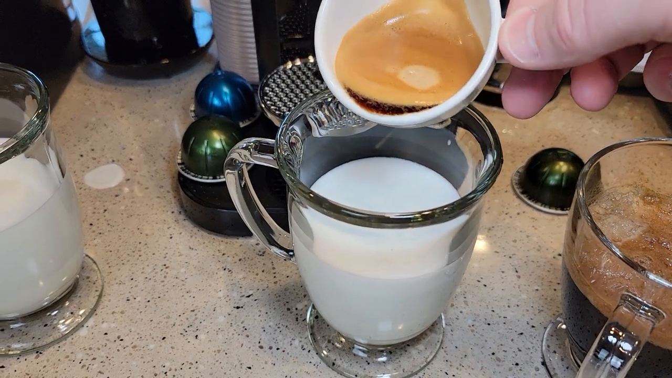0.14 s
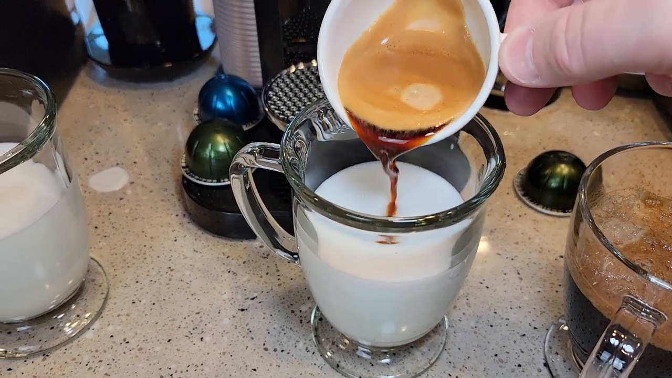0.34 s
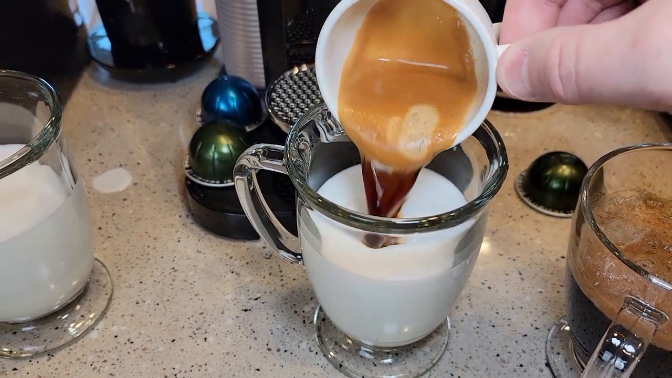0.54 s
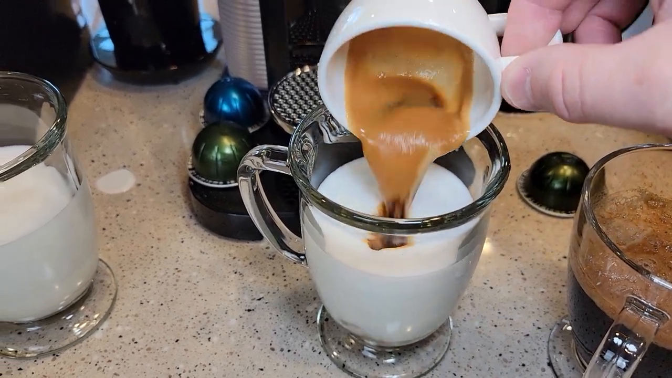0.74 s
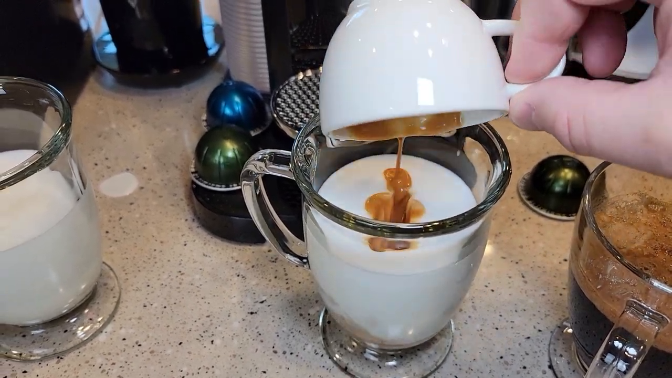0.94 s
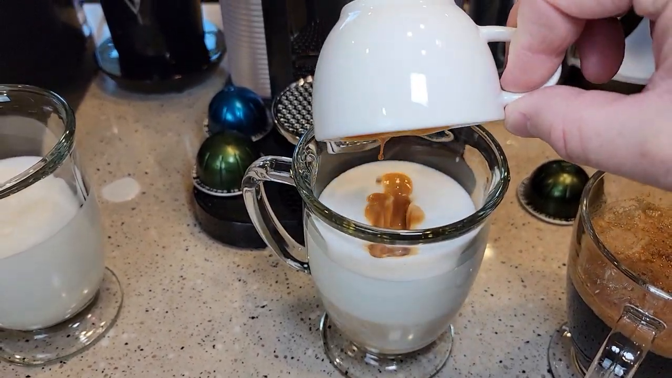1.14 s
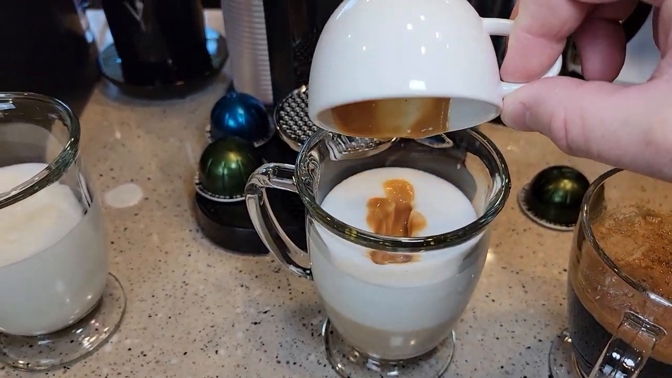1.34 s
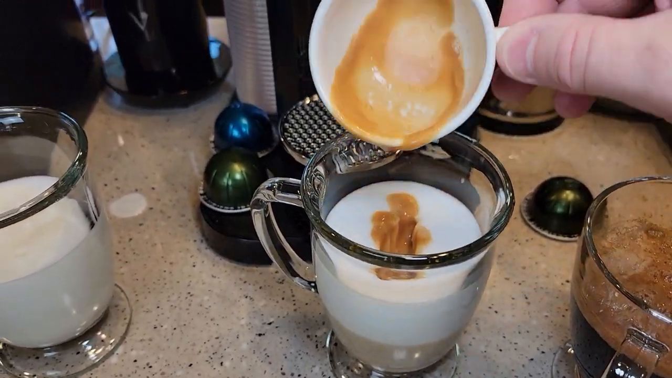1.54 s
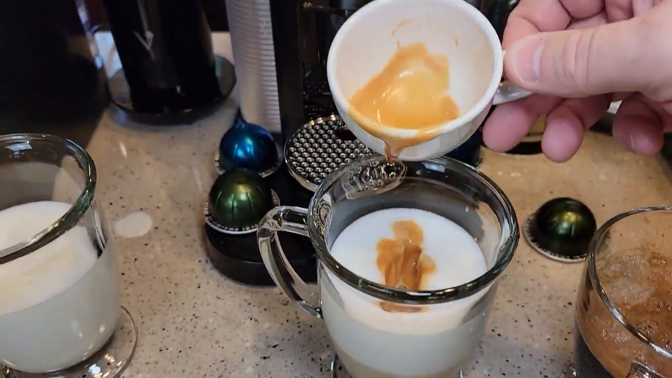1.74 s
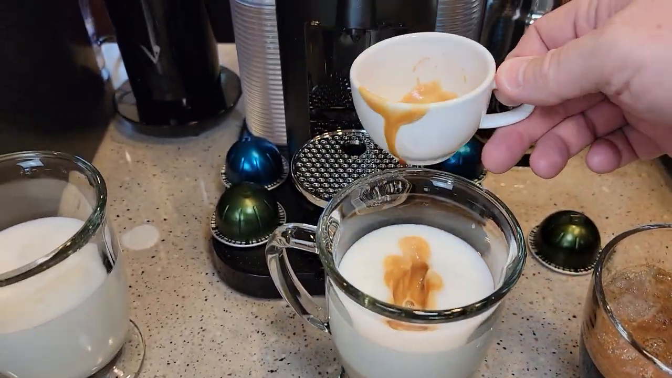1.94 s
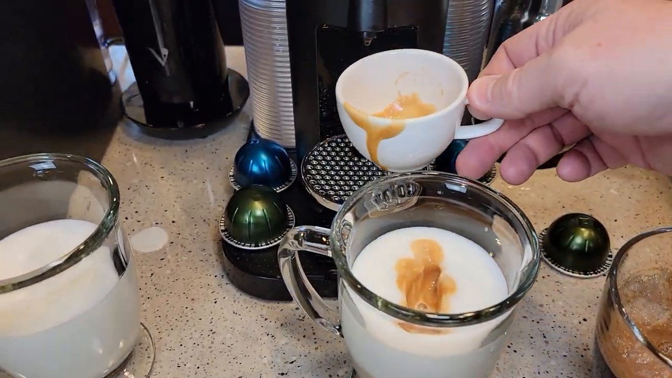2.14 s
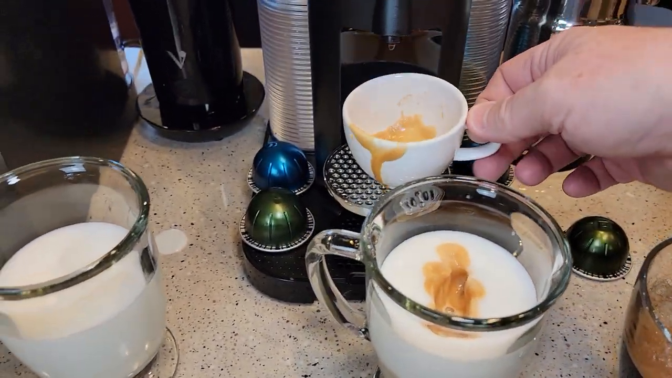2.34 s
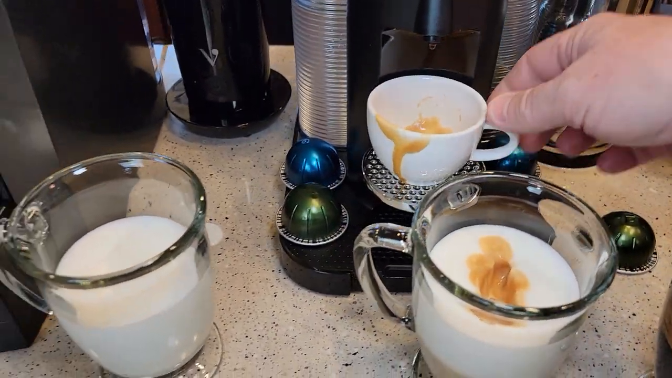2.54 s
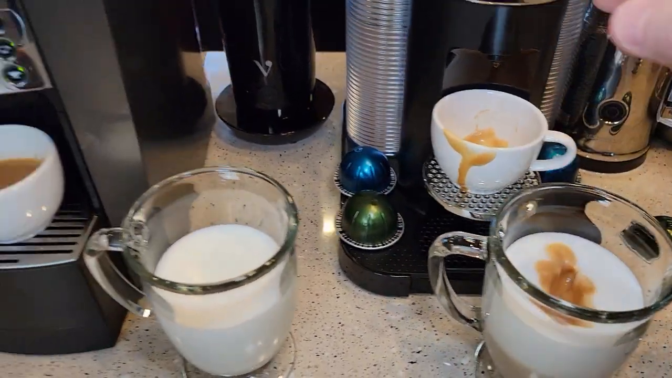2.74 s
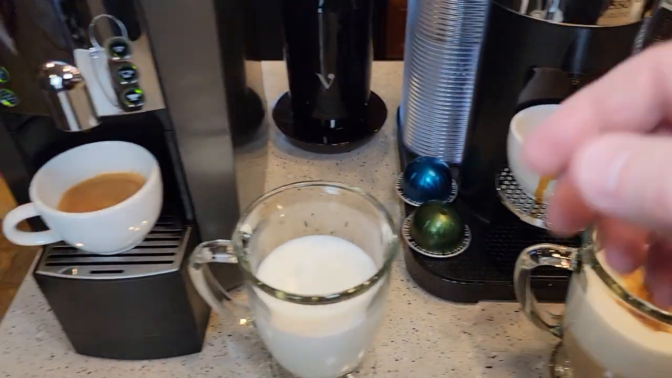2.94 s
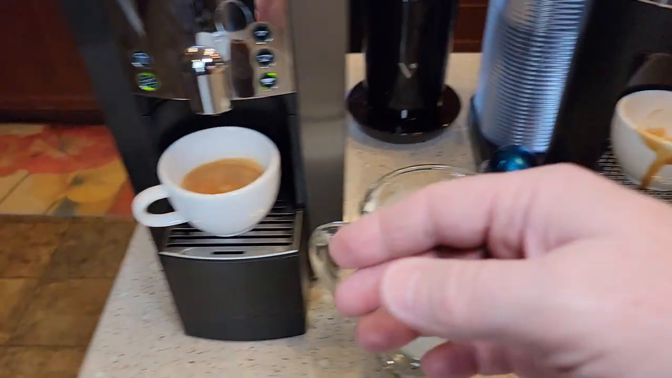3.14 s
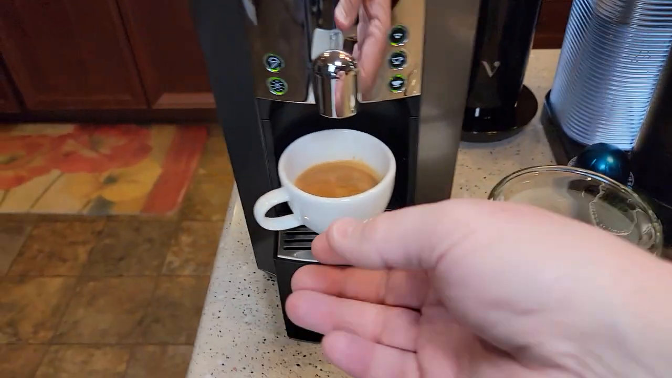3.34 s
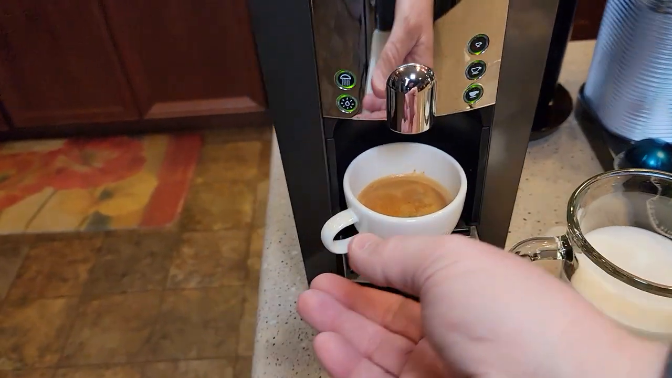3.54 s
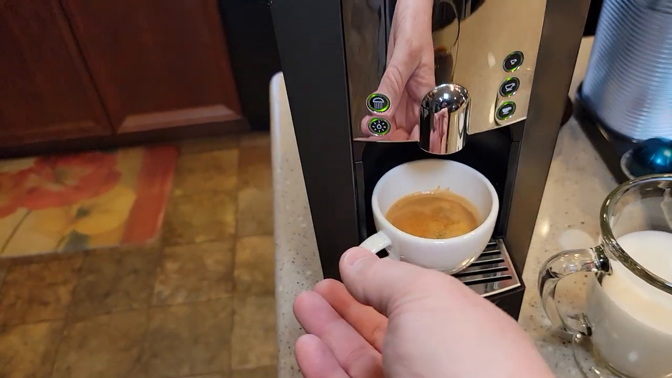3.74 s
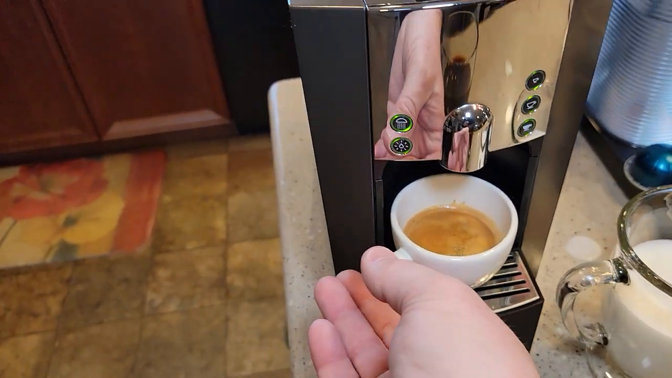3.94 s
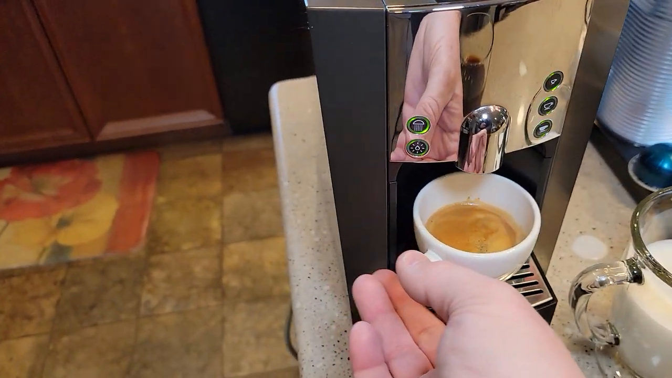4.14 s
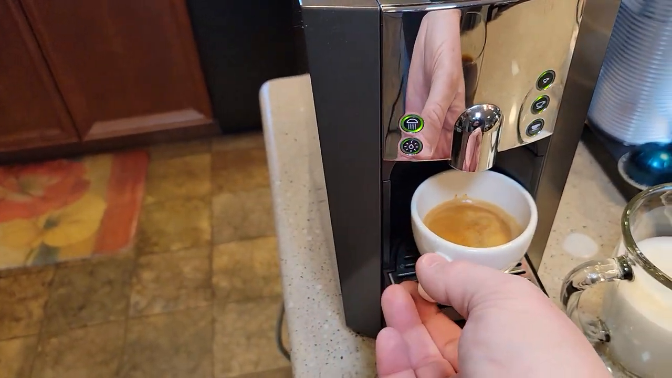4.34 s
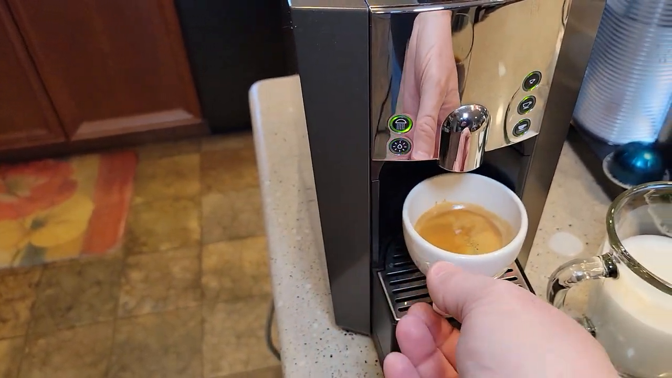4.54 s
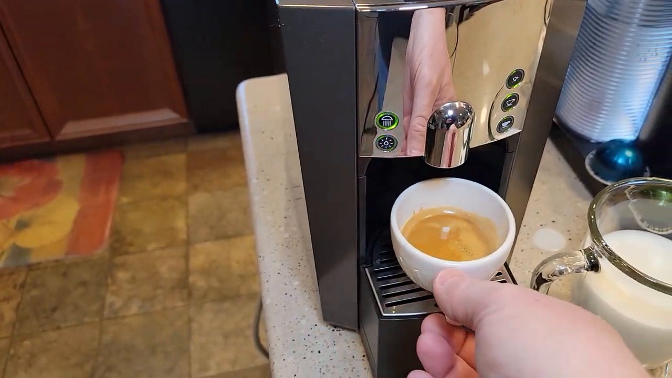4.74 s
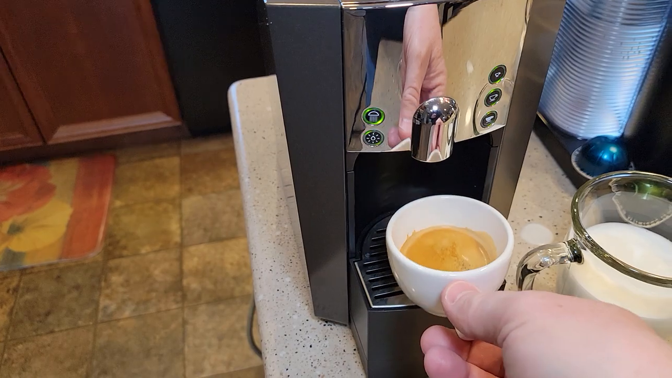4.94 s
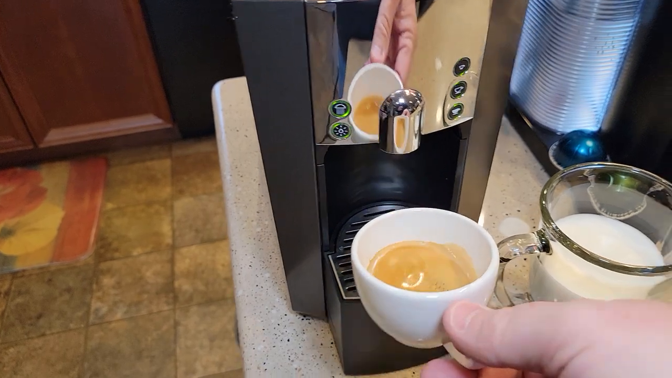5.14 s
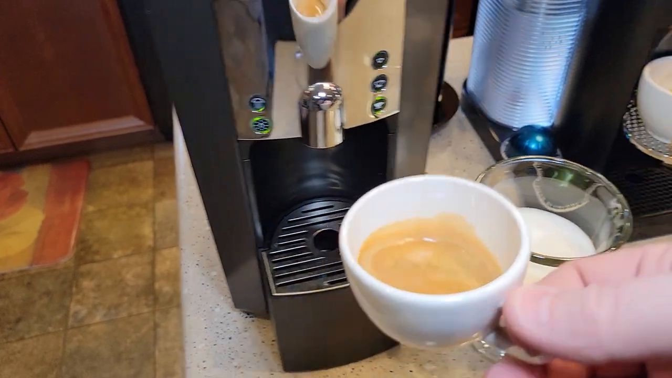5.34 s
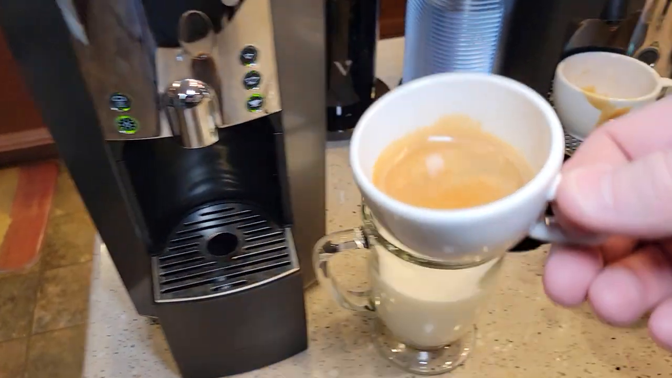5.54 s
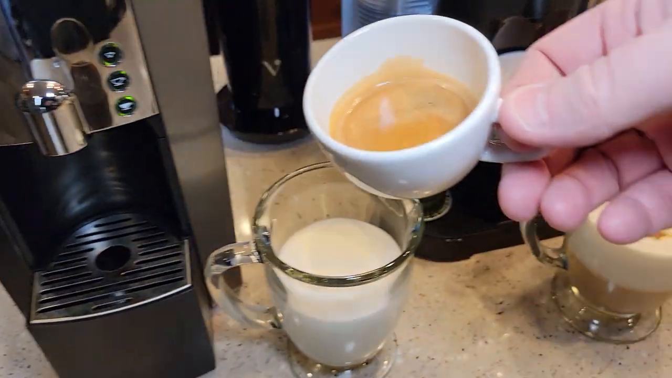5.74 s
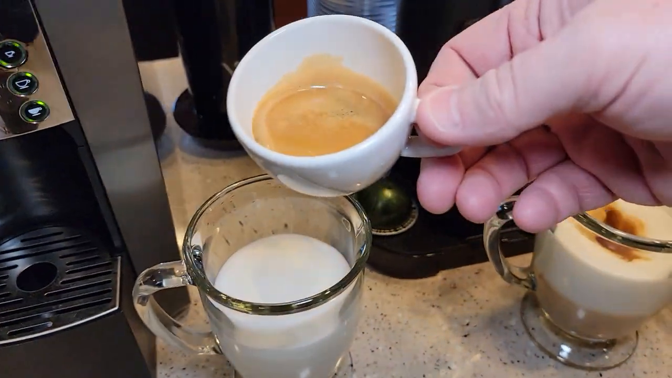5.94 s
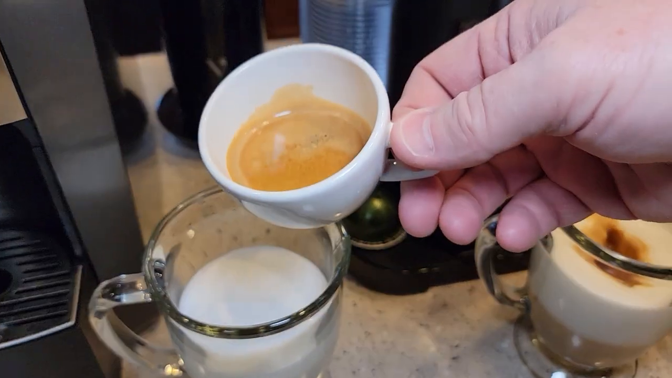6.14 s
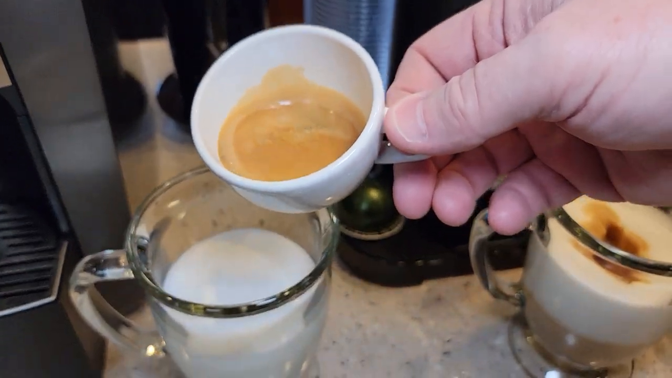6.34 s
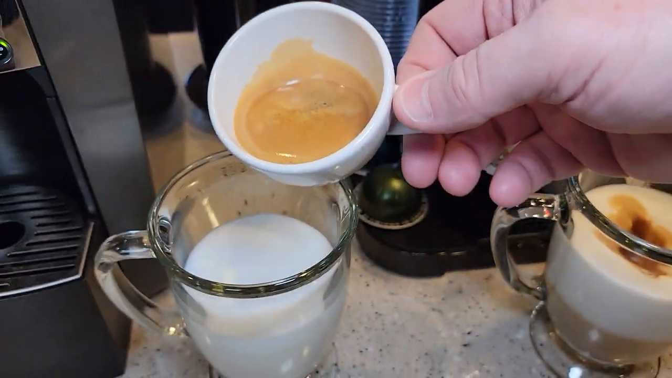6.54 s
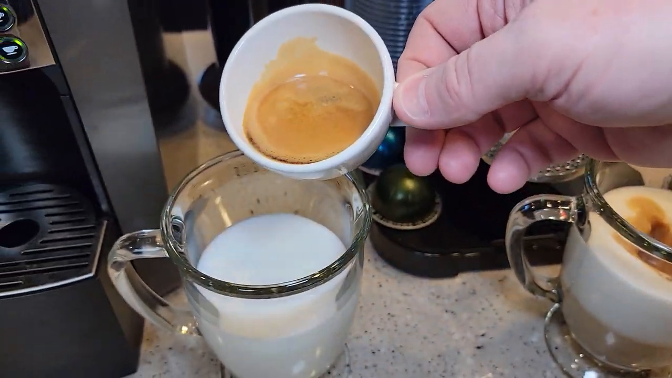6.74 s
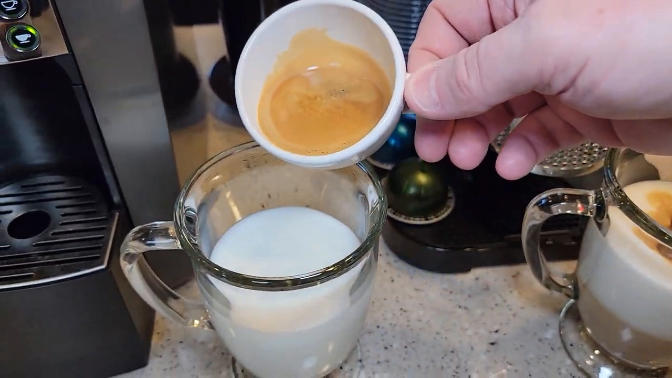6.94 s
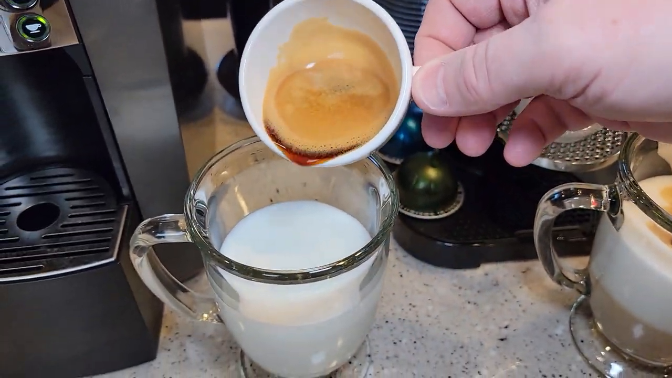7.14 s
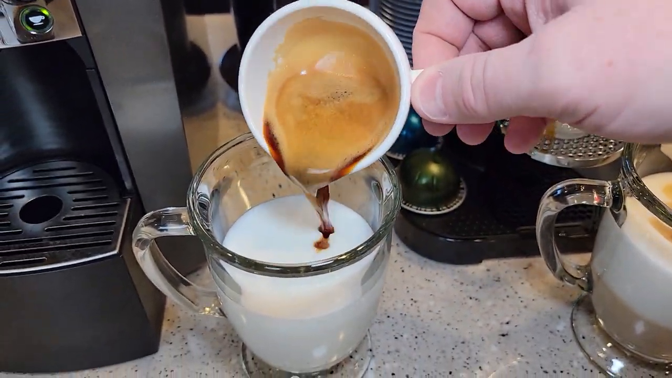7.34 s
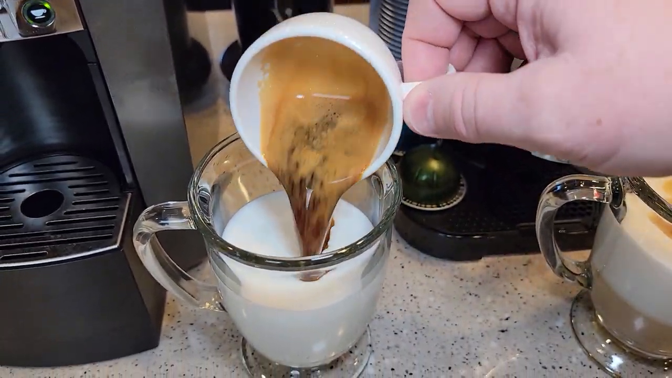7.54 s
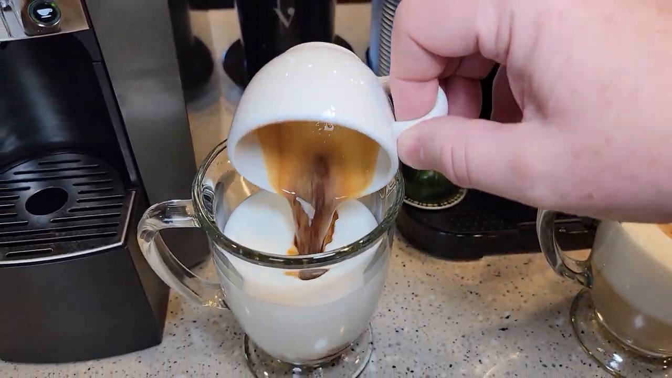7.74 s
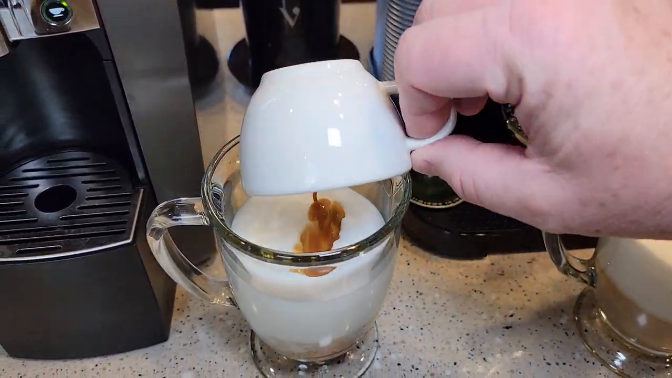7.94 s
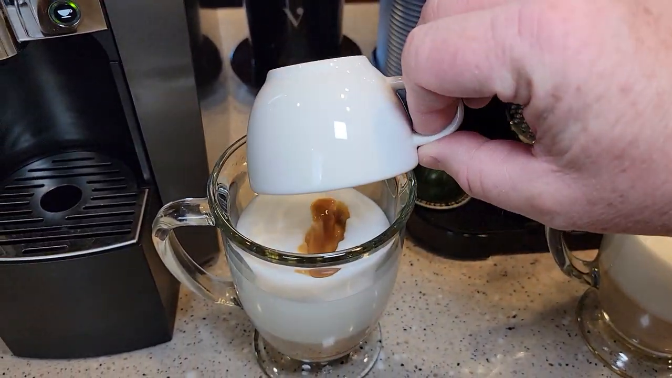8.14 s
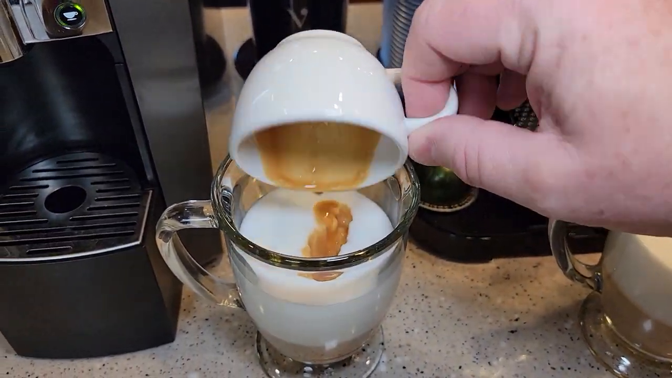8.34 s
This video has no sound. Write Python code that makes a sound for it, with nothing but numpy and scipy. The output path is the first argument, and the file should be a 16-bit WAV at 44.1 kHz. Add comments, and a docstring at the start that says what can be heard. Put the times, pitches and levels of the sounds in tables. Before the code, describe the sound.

Close to the microphone in a quiet, faintly humming kitchen, a china cup knocks lightly and rubs, then coffee trickles into milk. Two hard knocks strike almost together, and the cup rattles onto a metal tray. A sleeve rustles over low handling bumps; another cup knocks and scrapes over slats. After a soft footfall and a lull come light knocks, a couple of drops and a bright clink on the half-full glass mug.

```python
"""Small china cups are tipped into glass mugs of milk, close by in a quiet, faintly humming kitchen.
A knock, light taps and rubs open it; coffee trickles; two hard knocks come before a cup rattles on a
metal drip tray. Cloth rustles over low bumps, a cup knocks and scrapes over slats, and a soft footfall
passes. More knocks follow, a few drops fall, and the cup clinks on a half-full mug. Blows are pressure
swings plus dying sines, scrapes are random slips through resonances, cloth and air are shaped noise."""
import sys
import numpy as np
from scipy import signal
from scipy.fft import rfft, irfft
from scipy.io import wavfile
from scipy.ndimage import uniform_filter1d

SR = 44100
rng = np.random.default_rng(int(sys.argv[2]) if len(sys.argv) > 2 else 0)


def wrap_up_sound(samples):
    """Save the sound to the file named by the first command line argument, as 16-bit audio."""
    columns = np.atleast_2d(samples).T
    # keep every value between -1 and 1, then stretch to whole-number steps
    tamed = np.clip(columns, -1, 1)
    steps = np.round(tamed * 32767).astype(np.int16)
    wavfile.write(sys.argv[1], SR, steps)


N = 370440

# dull knock of struck china, relative levels: f/Hz, level/dB, t60/s
DULL_MODES = [(826, -2, 0.073), (899, 4, 0.04), (1010, -5.5, 0.086), (1190, -5.5, 0.11), (1270, -6, 0.13),
              (1310, -5, 0.087), (1430, 0, 0.058), (1551, -12.5, 0.11), (1710, -13, 0.12),
              (1990, -11.5, 0.027), (1804, -11.5, 0.16), (2075, -8.5, 0.042), (2501, -11, 0.062),
              (2836, -17.5, 0.059), (3170, -21, 0.028)]
# bowl of the cup, relative levels: f/Hz, level/dB, t60/s
BOWL_MODES = [(2196, 0, .19), (2302, -4, .24)]
# rim of the cup, relative levels: f/Hz, level/dB, t60/s
RIM_MODES = [(5610, 0, .14), (5655, -8, .08), (7220, -17, .08), (10300, -24, .18), (10900, -20, .05)]
# lip of the cup, relative levels: f/Hz, level/dB, t60/s
LIP_MODES = [(6440, 0, .14), (8990, -13, .08), (9550, -17, .08), (11380, -17, .08), (13900, -18, .07)]


def gain_of(db):
    """Decibels to gain."""
    return 10 ** (np.asarray(db) / 20)


def evened(x):
    """Scales to rms 1."""
    return x / np.sqrt(np.mean(x ** 2) + 1e-20)


def read(points, hz):
    """Reads a curve of (f/Hz, value) points on a log-frequency axis."""
    f, value = np.transpose(points)
    return np.interp(np.log(hz + 1), np.log(f + 1), value)


def add(mix, s, sound, pan_db):
    """Places a sound (one or two channels) at s seconds, left over right by pan_db."""
    part = mix[:, round(s * SR):][:, :sound.shape[-1]]
    part += gain_of([[pan_db / 2], [-pan_db / 2]]) * sound[..., :part.shape[1]]


def coloured(x, spectrum):
    """Filters by a spectrum in dB, rms 1."""
    gains = gain_of(read(spectrum, np.fft.rfftfreq(len(x), 1 / SR)))
    return evened(irfft(rfft(x) * gains, len(x)))


def all_around(hz, left, other):
    """Short-time spectra in both channels of sound that arrives from every side."""
    # how alike the channels are: f/Hz, likeness (1 = same)
    likeness = [(60, 0.72), (200, 1), (350, 0.52), (600, 0.91), (1000, 0.67), (1500, 0.89), (2200, .15),
                (15000, .1)]
    # how far the left leads: f/Hz, phase/rad
    left_lead = [(60, 0.23), (200, 0.91), (350, 1.5), (600, 2.1), (1000, 4.1), (1500, 4.4), (3000, 1.4)]
    same = np.clip(read(likeness, hz), -1, 1)[:, None]
    turn = np.exp(-1j * read(left_lead, hz))[:, None]
    right = same * left * turn + np.sqrt(1 - same ** 2) * other
    return np.array([left, right])


def air(patchy_db=2.0, swell_db=1.75, level_db=-57.5):
    """Room tone: random short-time spectra with drifting patches, plus wavering hums."""
    # colour of the room tone, relative: f/Hz, level/dB per Hz
    tone = [(12, -47), (20, -24), (65, -13), (91, -17), (108, -7), (174, -8.5), (224, -10.5), (314, -2.5),
            (416, -6), (452, -7.5), (535, -5), (839, -15.5), (1600, -27.5), (15200, -47.5), (16500, -53)]
    # sideways lean of the room tone: f/Hz, L-R/dB
    tone_pan = [(60, 1.5), (240, 0.5), (950, 2.5), (3770, 3), (15000, 4)]
    # appliance hums: f/Hz, middle level/dB
    hums = [(120, -69), (160, -70), (192, -66.5), (317, -69)]
    frames, hz = (N // 256 + 9) // 2, np.fft.rfftfreq(2048, 1 / SR)
    a, b, c, d, patches = rng.standard_normal((frames, 1025, 5)).T
    patches = uniform_filter1d(patches, size=20, axis=0)
    patches = evened(uniform_filter1d(patches, size=8, axis=1))
    swell = evened(uniform_filter1d(rng.standard_normal(frames), size=12))
    lean = gain_of(np.multiply.outer([1, -1], read(tone_pan, hz) / 2))[:, :, None]
    level = gain_of(read(tone, hz)[:, None] + patchy_db * patches + swell_db * swell)
    spectra = lean * all_around(hz, a + 1j * b, c + 1j * d) * level
    out = gain_of(level_db) * evened(signal.istft(spectra, nperseg=2048, noverlap=1536)[1][:, :N])
    t = np.arange(N) / SR
    for f, db in hums:
        waver = evened(uniform_filter1d(rng.standard_normal(N), size=6000))
        # level and phase waver together
        out = out + gain_of(db + 3 * waver) * np.sin(2 * np.pi * f * t + 2.4 * waver)
    return out


def ring(modes, db, tilt_db=0, spread_db=2.0, beam_db=4.0, detune=0):
    """Dying sines; every blow lands on another spot, and each mode beams differently left and right."""
    hz, mode_db, t60 = np.transpose(modes)[:, :, None]
    t = np.arange(round(.3 * SR)) / SR
    spot, skew, turn, off = rng.standard_normal((len(hz), 4)).T[:, :, None]
    hz = hz * (1 + detune * off)  # random detuning of each mode per blow
    # well above 690 Hz a mode reaches each channel with its own level and phase
    apart = np.array([1, -1])[:, None, None] * hz ** 2 / (hz ** 2 + 690 ** 2)
    level_db = db + mode_db + spread_db * spot + tilt_db * np.log2(hz / 1000) + beam_db * skew * apart
    decay = gain_of(level_db - 60 * t / np.clip(t60, .02, .3))
    waves = decay * np.sin(2 * np.pi * hz * t + 3 * spot + 1.384 * turn * apart)
    onset = 1 - np.exp(-t * hz / 1.8)
    return (waves * onset).sum(1)


def crack(db, swing_ms, turns=0.61, grit_db=-30):
    """The contact itself: a brief swing of pressure with a gritty edge."""
    t = np.arange(round(.3 * SR)) / SR
    u = t * 1000 / np.clip(swing_ms, .1, 3) - 1.5  # time in swings, 0 at the peak
    swing = -np.exp(-(u / turns) ** 2) * np.cos(2 * np.pi * u)
    grit = rng.standard_normal((2, len(t))) * np.exp(-t / 0.0013) * np.minimum(t / 0.00064, 1)
    return gain_of(db) * (swing + gain_of(grit_db) * grit)


def knocks():
    """China blows: a crack, a dull thud, and the glass mug and cup bodies ringing; soft blows dwell longer."""
    # t/s, crack/dB, low thud/dB, mug/dB, mug tilt/(dB/octave), cup/dB, hardness/(dB/octave), L-R/dB
    blows = [(.181, -19.5, -39.5, -33.5, -9.5, -42, -3.5, 1),
             (1.815, -3.5, -17.5, -25.5, 9.5, -25, 1.5, -0.5),
             (1.832, -6.5, -31, -19.5, 10.5, -28.5, -4, 10),
             (2.162, -56.5, -48, -61.5, -13.5, -66.5, 1, 14), (3.213, -51.5, -46, -62, -9, -101, 5, 8),
             (3.949, -54, -55.5, -62.5, -10.5, -66.5, 5, 2.5), (4.264, -38.5, -45, -45.5, -8, -56, -3, 8.5),
             (4.274, -41, -45, -67, -2, -56, -3, -4), (4.353, -48, -54, -54, -1, -66, 13, 3),
             (4.42, -65, -51, -58, -2.1, -72, -1, 3), (4.507, -57, -53, -45, 20, -71, .1, 3),
             (4.696, -32.5, -44.5, -37, 2, -58.5, 11, 7.5), (4.704, -27, -39, -34, 9, -56, -2.1, -2),
             (4.734, -24, -38, -29.5, 4, -62, 10, -10), (4.741, -27, -30.5, -41, -12, -66, 8, 1.5),
             (4.767, -50, -41, -60, 17, -60.5, 17, 3), (4.878, -36.5, -50, -31, 39, -55.5, 13, 5.5),
             (4.929, -37.5, -60, -33.5, 30, -67, 2, 1), (6.845, -24, -36, -20.5, 18.5, -36, 3, 7),
             (6.878, -44.5, -51.5, -44, -5, -58, -17.5, -3), (7.071, -66, -56.5, -39, 39, -89, 3, 0),
             (7.147, -48.5, -72, -51, 21, -65.5, 18, 2), (7.19, -59, -55.5, -33.5, 36, -74, .1, 3.5),
             (7.279, -32.5, -51, -27, 26.5, -49.5, -0.5, 5), (7.317, -51.5, -67.5, -45.5, 5.5, -73, 13, 2),
             (7.633, -39.5, -65.5, -54, 8, -55, 9.5, 2.5), (7.647, -48, -62.5, -49.5, 13.5, -59.5, -11, 3)]
    # low thud, relative levels: f/Hz, level/dB, t60/s
    thud_modes = [(188, -4.5, 0.072), (214, -2.5, 0.1), (283.2, -2, 0.12), (357, 3, 0.059),
                  (409, -3.5, 0.11)]
    # belly, wall and hollow of the mug, relative levels: f/Hz, level/dB, t60/s
    belly_modes = [(549.3, 1, 0.075), (590, -4.5, 0.13)]
    wall_modes = [(705, 0, .11), (780, -4, .07)]
    hollow_modes = [(984, 1, 0.033), (1038.7, -4.5, .04)]
    # side wall of the cup, relative levels: f/Hz, level/dB, t60/s
    side_modes = [(4430, 0, .15)]
    # how strongly a blow reaches bowl, side, rim and lip: level/dB
    cup_share = [1, -26.5, -16.5, -26.5]
    out = np.zeros((2, N))
    mug_modes = belly_modes + wall_modes + hollow_modes
    cup_parts = (BOWL_MODES, side_modes, RIM_MODES, LIP_MODES)
    for s, db, thud_db, mug_db, height_db, cup_db, hard_db, pan_db in blows:
        contact_ms = .55 * gain_of(-.052 * db)
        # the dull knock grows more slowly than the crack
        dull = ring(thud_modes, thud_db) + ring(DULL_MODES, -18 + .81 * db)
        mug = ring(mug_modes, mug_db, height_db, spread_db=1.95, beam_db=4.0)
        # hardness tilts the cup around its first bowl mode
        at_bowl_db = cup_db - hard_db * np.log2(BOWL_MODES[0][0] / 1000)
        cup = sum(ring(modes, at_bowl_db + share_db, hard_db, spread_db=4.43, beam_db=0.5)
                  for modes, share_db in zip(cup_parts, cup_share))
        add(out, s, crack(db, contact_ms) + dull + mug + cup, pan_db)
    return out


def taps_and_rubs():
    """Soft blurred taps and brief rubs of the cup: short noise bursts ring its modes."""
    # relative levels: t/s, dull knock/dB, bowl/dB, rim/dB, lip/dB, burst length/s, L-R/dB
    touches = [(0.238, -57, -66, -92, -61.5, 0.0066, 7), (.26, -59.5, -68, -92, -81, .09, 3),
               (.351, -55, -53, -88, -55, 0.013, 2.1), (0.4, -58, -54, -88, -57, 0.0072, 5),
               (7.621, -52.5, -57, -59, -81.5, .012, 6.5)]
    out = np.zeros((2, N))
    parts = (DULL_MODES, BOWL_MODES, RIM_MODES, LIP_MODES)
    for s, *body_db, length, pan_db in touches:
        burst = rng.standard_normal(round(length * SR)) / np.sqrt(500)
        touch = sum(ring(modes, db, spread_db=2.5, beam_db=-0.5) for modes, db in zip(parts, body_db))
        add(out, s, signal.fftconvolve(touch, burst[None], axes=1), pan_db)
    return out


def coffee(pan_db=7.5):
    """Each drop is a short dull plop with a bright tick of three sines on top."""
    # relative levels: t/s, plop/dB, tick/dB
    drops = [(.5878, -59, -76), (0.6117, -55, -63), (0.71, -52, -65), (.7294, -55, -64),
             (.7495, -37.5, -56), (0.7795, -55, -54), (.7858, -51, -58), (.8165, -53, -72),
             (0.854, -55, -70), (0.8725, -52, -65), (.895, -64, -69), (.9074, -57, -65), (1.3186, -66, -68),
             (1.4194, -67, -62.5), (1.4995, -62, -70), (7.766, -54, -65), (7.7845, -46, -67)]
    # sines of a tick: f/Hz
    tick_hz = [3060, 4140, 6040]
    out, t = np.zeros((2, N)), np.arange(300) / SR
    tick_shape = np.e * t / 0.001 * np.exp(-t / 0.00058)
    for s, db, tick_db in drops:
        add(out, s, crack(db, swing_ms=.78, turns=.9, grit_db=-10.0), pan_db)
        tick = sum(gain_of(4.1 * rng.standard_normal()) * np.sin(2 * np.pi * hz * t) for hz in tick_hz)
        add(out, s, gain_of(tick_db) * tick * tick_shape, pan_db)
    return out


def drag(slats_db=10.5, shift_db=6.5, wander=.015, pan_db=3.0):
    """Uneven slips of unglazed china; the cup's foot touches now one slat, now another."""
    # strokes over the slats: t/s, rise/s, hold/s, level/dB, brightness/dB
    strokes = [(2.242, 0.0048, 0.0048, -21, 14), (2.349, 0.023, 0.0018, -35.5, -10),
               (2.437, 0.013, 0.012, -48.5, -6), (3.947, 0.0042, 0.026, -57.5, 4.5),
               (3.961, 0.036, .17, -48, 5.5), (4.257, 0.0042, 0.0041, -48, 7.5),
               (4.339, 0.017, 0.0016, -53.5, -2.5), (4.41, .012, 0.0019, -47.5, -12),
               (4.46, .03, 0.065, -61.5, -5), (4.541, 0.019, 0.08, -52, 13),
               (4.682, 0.0051, .02, -46.5, -0.5), (4.729, 0.0055, .002, -31, -6),
               (4.77, 0.0092, 0.13, -50, 4)]
    # slat resonances, relative levels: f/Hz, width/Hz, level/dB
    slat_modes = [(766.5, 100, -1), (1010, 80, -1.5), (1180, 180, 2.5), (1440, 74, -5.5), (1870, 21, -15.5),
                  (2246, 22, -12), (2470, 170, -8.5), (3076, 80, -3.5), (3370, 80, -7), (3890, 120, -5),
                  (4340, 410, -12.5), (5040, 77, -20.5), (5330, 120, -22), (5590, 29, -13.5),
                  (6050, 73, -14), (6450, 43, -18), (6704, 19, -14), (6780, 53, -21), (7580, 60, -13.5),
                  (8036, 35, -16), (9060, 60, -19), (9700, 191, -26.5), (10815, 240, -30), (10800, 32, -27),
                  (11950, 35, -23.5), (12620, 36, -28.5), (13100, 87, -25.5), (13564, 48, -21),
                  (15000, 61, -26.5), (15400, 28, -20)]
    # colour of the rough contact, relative: f/Hz, level/dB per Hz
    grit_colour = [(180, -36), (300, -4.5), (447, -17.5), (1250, -1), (2000, -21), (3130, -8), (4750, -14),
                   (8940, -22), (10400, -31.5), (16000, -31.5)]
    out, lag = np.zeros((2, N)), np.arange(2000) / SR
    for s, rise, hold, db, bright_db in strokes:
        t = np.arange(0, rise + hold + .1, 1 / SR)
        # a stroke rises from 23 dB down and dies at 380 dB per second
        stroke_db = db - 23 * np.maximum(1 - t / rise, 0) - 380 * np.maximum(t - rise - hold, 0)
        # about 6000 slips a second, of uneven strength
        strength = gain_of(2.8 * np.minimum(rng.exponential(1, len(t)), 3))
        slips = (rng.random(len(t)) < 6000 / SR) * strength
        shared, left, right = rng.standard_normal((3, len(t)))
        slips = slips * (shared + 1.1 * np.array([left, right]))
        touch = evened(uniform_filter1d(rng.standard_normal((len(slat_modes), len(t))), size=2000))
        touch = gain_of(shift_db * np.clip(touch, -3, 1.4))  # random gains, clipped so no slat sticks out
        # each stroke detunes the slats a little at random
        detuned = 1 + wander * rng.standard_normal(len(slat_modes))
        slats = 0
        for (f, width, mode_db), k, g in zip(slat_modes, detuned, touch):
            mode = np.exp(-np.pi * width * lag) * np.sin(2 * np.pi * f * k * lag)
            mode = gain_of(mode_db) * width * mode
            slats = slats + signal.oaconvolve(slips * g, mode[None])[:, :len(t)]
        rub = np.array([coloured(x, grit_colour) for x in slips]) + gain_of(slats_db) * evened(slats)
        # keeps the scrape free of bass
        rub = signal.lfilter(*signal.butter(N=3, Wn=450, btype="high", fs=SR), rub)
        dull = signal.lfilter(*signal.butter(N=2, Wn=1700, fs=SR), rub)
        rub = dull + gain_of(bright_db) * (rub - dull)
        rub = rub / np.sqrt(uniform_filter1d((rub ** 2).mean(0), size=2500))  # steady level before the stroke
        add(out, s, gain_of(stroke_db) * rub * signal.windows.tukey(len(t), .04), pan_db)
    return out


def rattles():
    """The cup lands and rocks on the drip tray; each landing bounces twice more, ever weaker."""
    # t/s, crack/dB, hardness/(dB/octave), L-R/dB
    landings = [(2.247, -2.5, 0.5, 2), (2.253, -8, -0.5, 0), (2.27, -6, 1, 3.5), (2.323, -22, -8.5, -2),
                (2.345, -30, -8.5, -1), (2.362, -20, -2, 9), (2.376, -16, -2.7, 3), (2.4, -24.5, -2.5, 0.5),
                (2.452, -32, -7, 6), (2.529, -54, -16.5, -1.5)]
    # metal tray, relative levels: f/Hz, level/dB, t60/s
    tray_modes = [(216, -10.5, 0.062), (338, -2.5, 0.076), (623.4, -10.5, .1), (850, -6.5, 0.061),
                  (1117, 0, .1), (1287, -4.5, 0.2), (1370, 0, 0.056), (1535, -8, 0.15), (1981, -3, 0.089),
                  (2087, -5, 0.046), (2126, -1, 0.048), (2634, -14.5, 0.068), (3250, -7, 0.089),
                  (3493, -4.5, 0.045), (3503, -3, 0.076), (3760, -7.5, .07), (4830, -11, 0.058),
                  (4900, -17.5, 0.071), (5400, -26.5, 0.036), (6700, -22, 0.084), (7560, -21, 0.12),
                  (8400, -25, .08), (9600, -26.5, 0.066), (10200, -31, .1), (10360, -25.5, 0.14),
                  (11700, -30.5, 0.13), (12240, -25, 0.11), (13400, -27.5, .1), (15000, -30, .15)]
    out = np.zeros((2, N))
    for s, db, tilt_db, pan_db in landings:
        blow = crack(db, swing_ms=.72, grit_db=-28.5)
        blow = blow + ring(tray_modes, db - 16.5, tilt_db, spread_db=0.5, detune=0.014)
        add(out, s, blow, pan_db)
        for late in np.cumsum(.009 * rng.uniform(0.59, 1.3, size=2)):  # seconds after the landing
            bounce = rng.choice([-1, 1]) * gain_of(-4.5 - 500 * late) * blow
            add(out, s + late, bounce, pan_db)
    return out


def sleeve(rough_db=1.0, pan_db=3.0, bright_hz=1800):
    """A sleeve swishes: cloth hisses unevenly, with separate noise in each channel."""
    # middle t/s, level/dB, half length/s, brightness/dB
    swishes = [(2.512, -65, 0.032, -2.5), (2.612, -70.5, 0.1, 1.3), (2.92, -63, .15, 1),
               (3.3, -62, .15, -1.5), (3.471, -65, 0.041, -4.7), (3.695, -70, 0.16, 8),
               (5.196, -73, 0.092, 1.5), (6.398, -73, 0.14, 3)]
    # colour of cloth, relative: f/Hz, level/dB per Hz
    cloth_colour = [(290, -41), (500, -10.5), (553, -1), (698, -18.5), (761, -3), (868, -10), (2070, -11),
                    (8960, -24), (16000, -30)]
    t, out = np.arange(N) / SR, np.zeros((2, N))
    left, right, creases = rng.standard_normal((3, N))
    creases = gain_of(rough_db * evened(uniform_filter1d(creases, size=400)))
    cloth = np.array([coloured(left, cloth_colour), coloured(right, cloth_colour)]) * evened(creases)
    dull = signal.lfilter(*signal.butter(N=2, Wn=bright_hz, fs=SR), cloth)
    for s, db, half, bright_db in swishes:
        swell = gain_of(db) * np.exp(-abs((t - s) / half) ** 3)
        add(out, 0, swell * (dull + gain_of(bright_db) * (cloth - dull)), pan_db)
    return out


def handling_bumps(rise_s=0.035):
    """Low bumps of handling: deep noise, alike in both channels, swells up to each bump and dies."""
    # t/s, level/dB, t60/s
    bumps = [(2.54, -53, .3), (2.808, -49, 0.15), (2.898, -44.5, 0.66), (3.23, -55.5, 0.5),
             (3.44, -52.5, 0.12), (3.51, -70, .3), (3.71, -67.5, .7)]
    # colour of a bump, relative: f/Hz, level/dB per Hz
    bump_colour = [(8.8, -29), (15, -6.5), (86, -9), (140, -1.5), (244, -10), (291, -26), (367, -15),
                   (500, -28), (650, -58), (1100, -120)]
    t, out = np.arange(N) / SR, np.zeros((2, N))
    envelope = 0
    for s, db, t60 in bumps:
        rise = np.clip(1 + (t - s) / rise_s, 0, 1) ** 2
        envelope = envelope + rise * gain_of(db - 60 * np.maximum(t - s, 0) / t60)
    add(out, 0, coloured(rng.standard_normal(N), bump_colour) * envelope, 0)
    return out


def cup_tones(start_s=0.0304):
    """High tones of the cup ring on as it lifts off after the scrape, with a soft noisy start."""
    # t/s, level/dB, L-R/dB
    tones = [(4.8, -59.5, 11.5), (4.83, -58.5, 13), (4.86, -62, -4), (4.894, -71, 4)]
    # high modes of the cup, relative levels: f/Hz, level/dB, t60/s (held to 0.3 s at most)
    tone_modes = [(5500, -2, 0.34), (6100, 13, 0.088), (6760, -0.5, 0.36), (8900, 2, 0.38), (15000, -5, .3),
                  (15400, -11, .3)]
    out, length = np.zeros((2, N)), start_s * SR
    for s, db, pan_db in tones:
        noisy_start = rng.standard_normal(round(length)) / np.sqrt(length)
        tone = ring(tone_modes, db, spread_db=4.0, detune=0.0044)
        add(out, s, signal.fftconvolve(tone, noisy_start[None], axes=1), pan_db)
    return out


def footfall(s=5.295, db=-35, hz=135.4, t60=0.06):
    """One soft step: two low sines that die quickly."""
    out = np.zeros((2, N))
    add(out, s, ring([(hz, 0, t60), (hz * 2.3, -8, t60)], db), 0)
    return out


def clinks():
    """The cup meets the half-full mug: a short crack and the ringing of the mug."""
    # t/s, crack/dB, ring/dB, L-R/dB
    meetings = [(7.804, -26, -27, 11), (7.809, -24.5, -23, -2.5), (7.827, -38.5, -35.5, 0.5),
                (7.87, -58, -66, 7)]
    # half-full mug, relative levels: f/Hz, level/dB, t60/s
    full_modes = [(552, 1, 0.032), (775, -16.5, 0.19), (910, -3, 0.053), (977, -11, 0.064),
                  (1015, -4.5, 0.049), (1272, -7.5, 0.043), (1730, -21, 0.072), (2290, -13.5, 0.15),
                  (2750, -9, 0.046), (2786, -9, 0.05), (2890, -10, 0.064), (2990, -19, .08),
                  (3550, -30, 0.065), (5730, -11.5, 0.071), (6611, -18, 0.023), (7192, -27, 0.064),
                  (9230, -34, 0.054), (10750, -24.5, 0.03), (13400, -37, 0.045)]
    out = np.zeros((2, N))
    for s, db, ring_db, pan_db in meetings:
        blow = crack(db, swing_ms=0.36, grit_db=-21)
        add(out, s, blow + ring(full_modes, ring_db, spread_db=2.0, detune=0.0061), pan_db)
    return out


def kitchen(x):
    """Echo: sparse taps of random sign, one in every 20 samples, each band dying at its own speed."""
    # echo time of the room: f/Hz, t60/s
    echo_t60 = [(150, 0.28), (500, 0.58), (1500, 0.38), (4000, 0.29), (10000, 0.25)]
    at = np.arange(90, SR // 2 - 20, 20) + rng.integers(0, 20, (2, (SR // 2 - 91) // 20))
    taps = np.zeros((2, SR // 2))
    np.put_along_axis(taps, at, rng.choice([-1., 1.], at.shape), axis=1)
    hz, t, z = signal.stft(taps, SR, nperseg=256)
    decay = gain_of(-60 * t / np.maximum(read(echo_t60, hz), .05)[:, None])
    z = all_around(hz, *z) * decay
    tail = signal.istft(z, SR, nperseg=256)[1][:, :SR // 2]
    tail = tail * (np.arange(SR // 2) > 90)  # nothing returns in the first 2 ms
    return signal.fftconvolve(x[None], tail / np.linalg.norm(tail[0]), axes=1)[:, :N]


def scene():
    """Everything on the counter, its echo in the kitchen, and the background."""
    near = knocks() + taps_and_rubs() + coffee() + drag() + rattles() + cup_tones() + clinks()
    # the microphone passes little deep bass from close sounds
    near = signal.lfilter(*signal.butter(N=2, Wn=59, btype="high", fs=SR), near)
    background = air() + sleeve() + handling_bumps() + footfall()
    return near + gain_of(-12.5) * kitchen(near[0]) + background


def record(dry):
    """The hardest blows bend over near full scale; then a low-pass at 15.85 kHz limits the band."""
    bent = dry / (1 + (abs(dry) / .93) ** 8) ** (1 / 8)
    low_pass = signal.firwin(511, 15850, window=("kaiser", 9), fs=SR)
    return signal.oaconvolve(bent, low_pass[None], "same")


dry = scene()
out = record(dry)
wrap_up_sound(out)
```